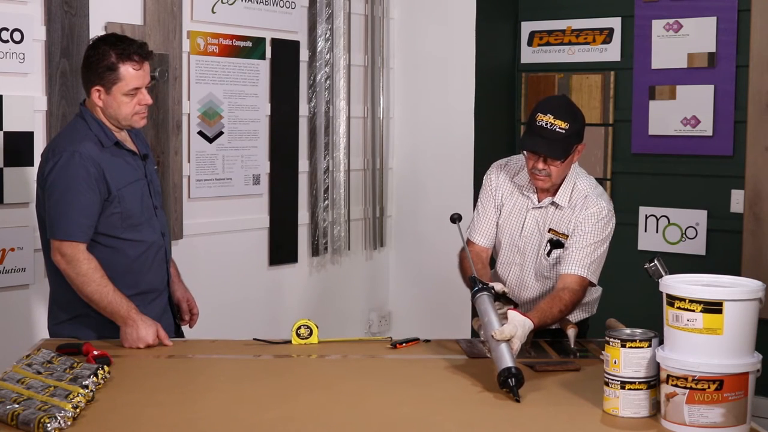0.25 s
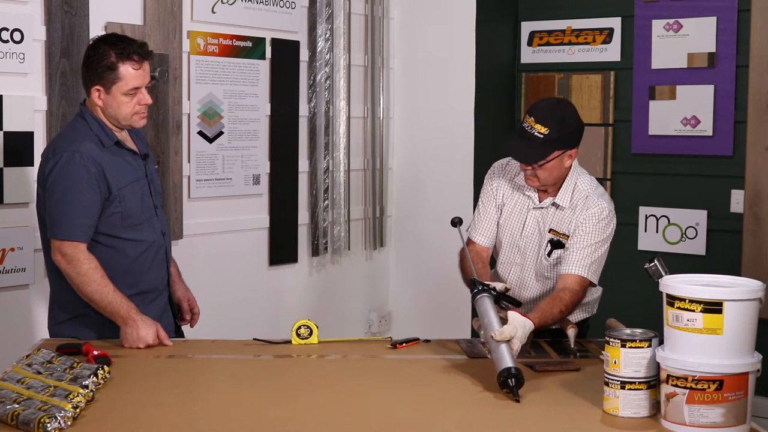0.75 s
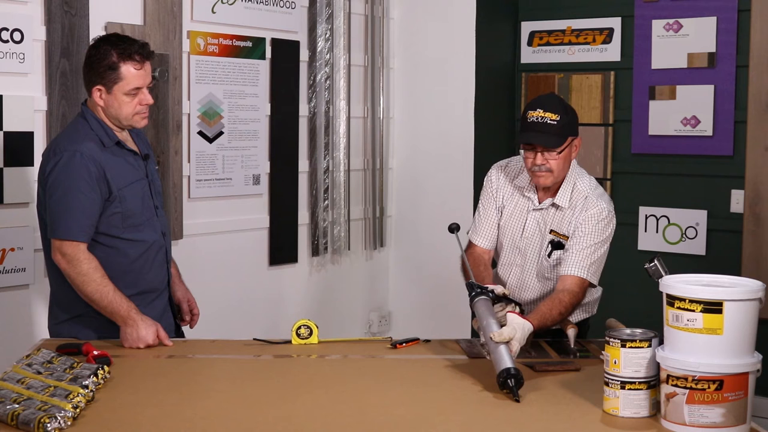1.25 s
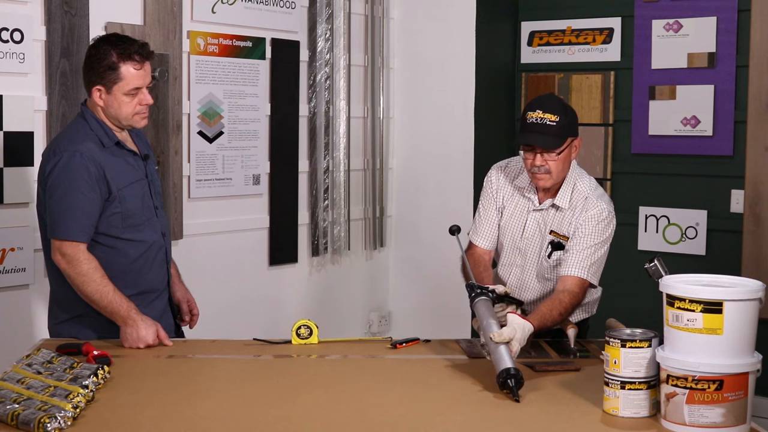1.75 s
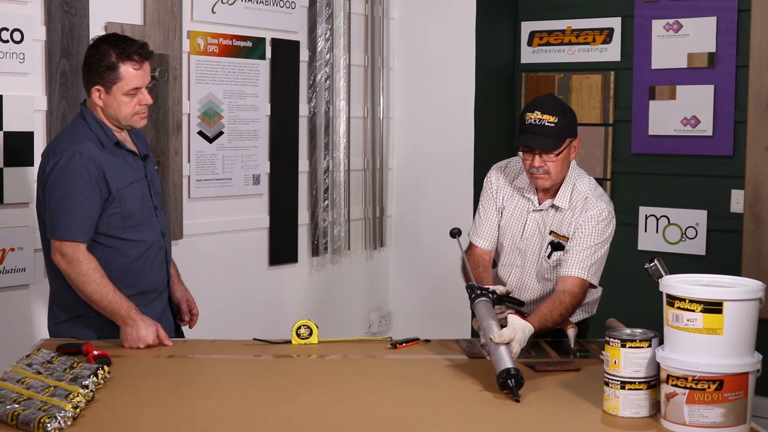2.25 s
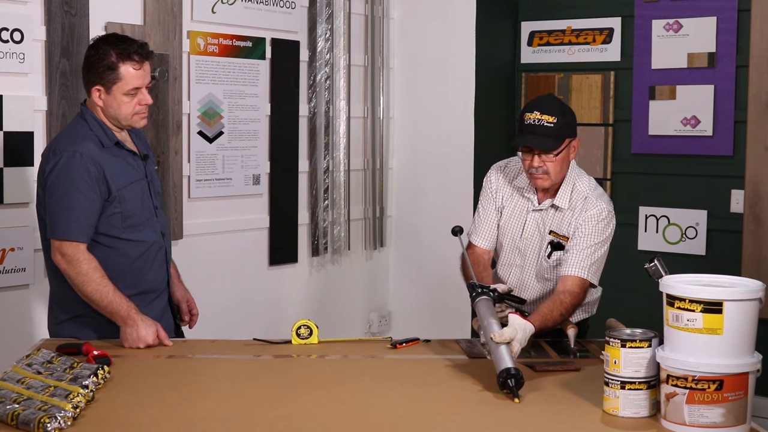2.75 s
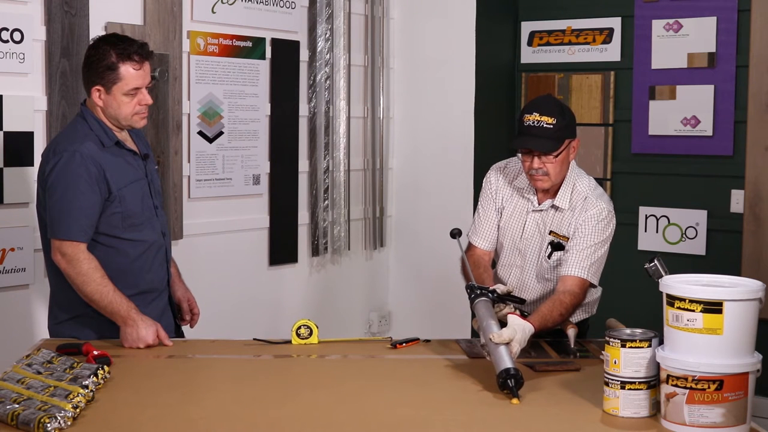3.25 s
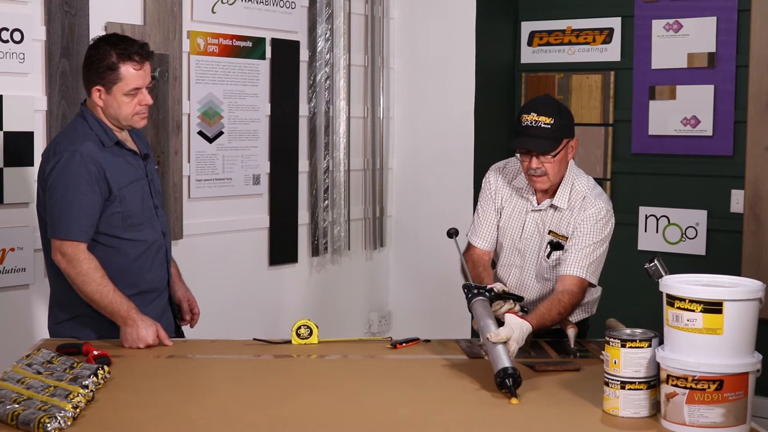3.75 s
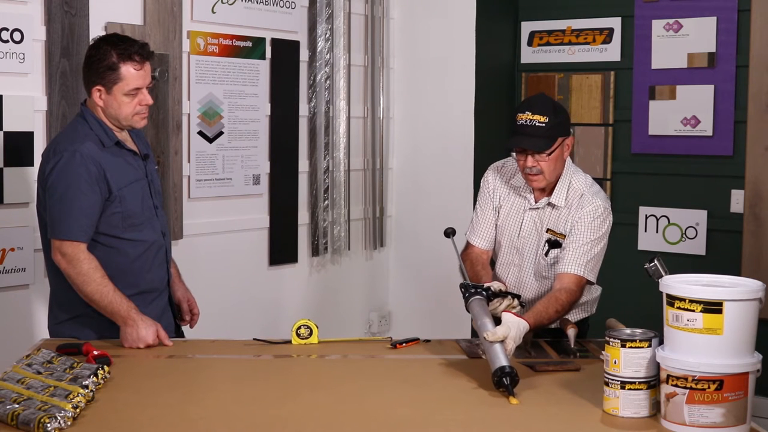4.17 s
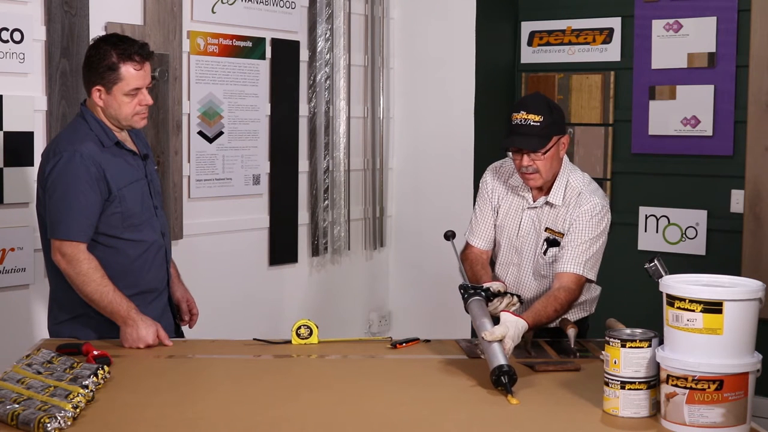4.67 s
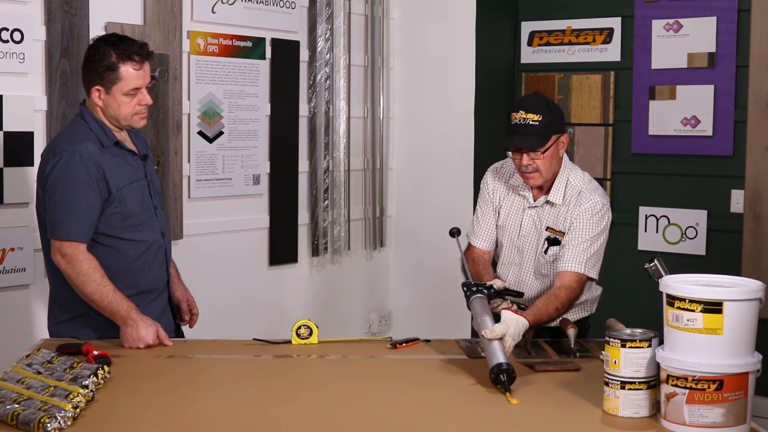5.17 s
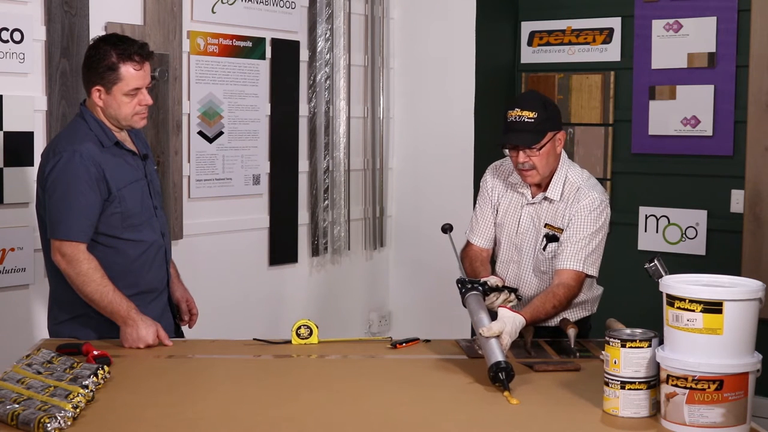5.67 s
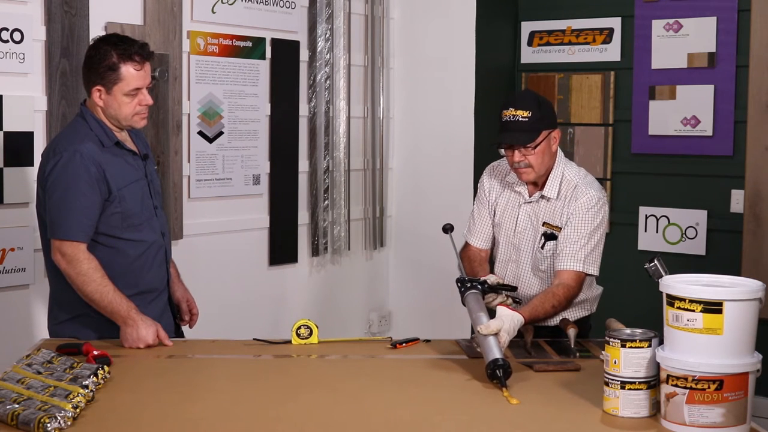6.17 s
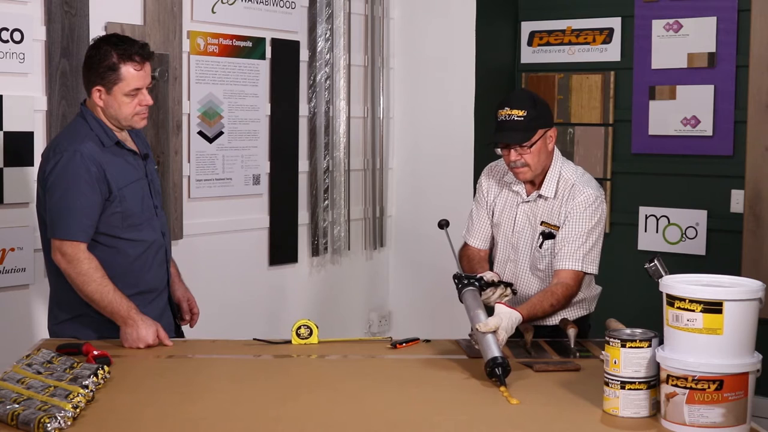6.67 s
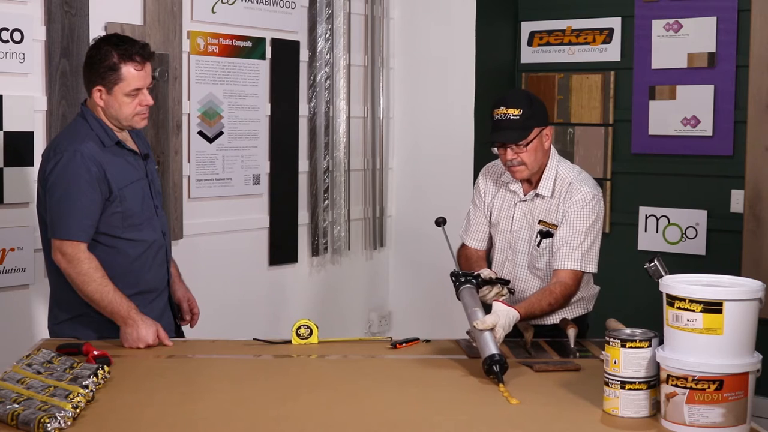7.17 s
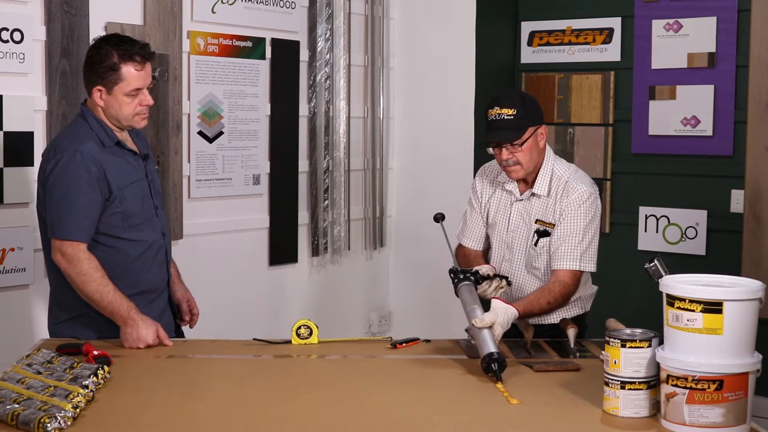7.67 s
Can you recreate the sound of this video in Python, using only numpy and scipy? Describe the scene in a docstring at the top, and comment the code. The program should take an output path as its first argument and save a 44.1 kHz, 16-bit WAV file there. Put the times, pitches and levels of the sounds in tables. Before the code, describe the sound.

A steel caulking gun is pumped close by in a quiet workshop with a little reverberation. From the start until about 2.8 seconds, the trigger is squeezed ten times, roughly three times a second, growing gradually softer. Each squeeze is a short metallic rasping click, with thin, high spring squeaks between. The grip plate clacks sharply at the very start, then judders and clacks at about 0.4 and 1.9 seconds. A cluster of clicks follows at 3.1 seconds and a few thin snaps near 3.8. The rest is sparse: a duller clack at 5 seconds, single lower squeaks around 5.1, 6.1 and 6.9, and small ticks and soft clinks until the end, near 8 seconds. Gloves and foil crackle faintly in the later part. Low room tone continues throughout, with faint distant drones coming and going.

```python
"""A steel caulking gun is pumped in a quiet workshop. The trigger rasps along the rod and the grip plate
judders and clacks back, all ringing the frame and barrel; the spring and the pivot squeak by stick-slip.
The pumping slows to single squeaks, ticks and soft clinks, while gloves and foil crackle.
Behind it, distant low drones come and go over room tone, a fan whine, a faint whistle and a soft hiss."""
import sys
import numpy as np
from scipy import signal
from scipy.fft import rfft, irfft, next_fast_len
from scipy.io import wavfile
from scipy.ndimage import uniform_filter1d

SR = 44100
rng = np.random.default_rng(int(sys.argv[2]) if len(sys.argv) > 2 else 0)


def generate_wav(sig):
    """Save sig (samples, or channels by samples) to the path in sys.argv[1] as 16-bit PCM at SR."""
    pcm = np.round(np.clip(np.atleast_2d(sig).T, -1, 1) * 32767).astype(np.int16)
    wavfile.write(sys.argv[1], SR, pcm)


N = 349342

# Ring of the frame and barrel: (pitch [Hz], level [dB], t60 [s])
FRAME_MODES = [(350, -17, 0.013), (669.7, -17, 0.023), (1083, -14, 0.032), (1503, -4, .012),
               (2050, -2.5, .011), (2520, -5, 0.013), (2770, 4.5, 0.0049), (3110, -9.5, 0.014),
               (3260, -20, 0.057), (3407, 11.5, 0.0023), (3768, 12, 0.0025), (4310, -22.5, .09),
               (4558, -16, 0.017), (5097, -5.5, 0.0069), (5430, -7.5, 0.0067), (5965, -9, 0.0099),
               (6737, -5, 0.0039), (7720, -9.5, 0.0049), (8550, -13.5, 0.009), (9300, -9.5, 0.002),
               (10630, -14, .006), (11100, -16, 0.00094), (13900, -21, .003)]
# Trigger squeezes, four touches each: (time [s], main touch delay [ms], last touch delay [ms],
# level [dB], last touch trim [dB], bass tilt [dB/octave])
SQUEEZES = [(0.1606, 17.3, 32.3, -15.5, -9, -15), (0.5063, 20.6, 35, -16, -11, -11),
            (0.7688, 19, 34.1, -18.5, -4.5, -6), (1.0716, 21, 35, -16.1, -11, 4.5),
            (1.4008, 21.2, 34.5, -19, -8.1, -4), (1.7066, 19.5, 35.1, -18, -8, -8),
            (2.0073, 16.6, 33.1, -21, -0.8, -10.5), (2.2574, 18.3, 42, -25, -18, -.6),
            (2.4882, 19, 30.2, -25.5, -8, -2), (2.7613, 19.2, 33.7, -24.5, -6, 1.5)]
# The four touches; the accent is the pitch that the struck spot favours:
# (level against the squeeze [dB], accent [Hz], treble tilt [dB/octave], base attack [ms])
SQUEEZE_TOUCHES = [(-13, 2100, 2, 1.6), (-4.5, 3500, 5, 3.1), (-1, 2750, 2, 1.3), (-1, 3500, 6, 1.4)]
# Touches and ticks turn crisper as the pumping slows: (time [s], attack scale [ratio])
ATTACK_SCALE = [(0, 0.89), (2.55, 0.98), (2.7, 0.66), (7.9, 0.73)]
# The trigger lets go: (time [s], touch level [dB], chirp level [dB], slide length [ms], slide level [dB])
RELEASES = [(0.291, -18.5, -63.5, 62, -69.5), (.592, -36, -45, 50, -83), (0.898, -38.5, -49, 59, -79),
            (1.223, -40.5, -48, 49, -79), (1.522, -34, -53, 49, -72.5), (1.809, -38.5, -46.5, 45, -70),
            (2.112, -36, -53, 46, -86), (2.345, -47, -60, 31, -78.5), (2.612, -40, -57, 64, -80.5)]
# The grip plate clacks back:
# (time [s], level [dB], accent [Hz], treble tilt [dB/octave], bass tilt [dB/octave], attack [ms])
PLATE_CLACKS = [(0.013, -1, 3105, 3.5, -2, 1.52), (0.374, -3, 3256, 4, 1.5, 0.96),
                (0.668, -15, 3130, -14, -1.5, 1.3), (1.87, -1.5, 2333, 2, -2.5, 1.36),
                (2.167, -11, 3170, -5.5, -3, 0.99), (4.9742, -18.5, 3050, -18.5, -2, 0.9)]
# Small ticks of the mechanism: (time [s], level [dB], accent [Hz], treble tilt [dB/octave])
TICKS = [(.5651, -26, 3530, 3), (.5754, -32, 2180, 8), (0.856, -26.5, 3960, -8), (1.1346, -35, 3140, 7),
         (1.191, -33, 3630, -7), (1.4866, -36.5, 3220, -6), (1.54, -42, 3680, 10), (1.7821, -28, 3490, 3.5),
         (2.0646, -29.5, 3530, 4), (2.1413, -32.5, 3760, 15.5), (2.3025, -27, 3280, 11.5),
         (2.5444, -27, 3300, 9.5), (2.565, -45, 3370, 12), (2.6383, -27, 2100, -2.5), (2.824, -38, 1720, 5),
         (3.048, -40.5, 2620, -1), (3.085, -29.5, 3700, 3), (3.0971, -23.5, 3260, 3.5),
         (3.1043, -20.5, 2790, 2), (3.1331, -26, 1546, -6), (3.2274, -35, 3370, -0.5),
         (4.0064, -44.5, 1737, 1.5), (5.1518, -32, 2270, -1.5), (5.172, -38, 3130, -2),
         (5.2933, -44, 3040, -7), (5.7716, -47, 3557, 0.7), (5.9414, -48, 3580, 7),
         (6.1764, -39, 3100, -0.5), (7.2417, -45, 3270, 10), (7.414, -45, 3520, -3.5),
         (7.7048, -44, 3000, 3.5), (7.88, -46, 5430, 0.3)]
# Thin bright snaps without body: (time [s], level [dB], accent [Hz])
SNAPS = [(3.7133, -53.5, 5960), (3.7501, -40.5, 4580), (3.7556, -43, 3850), (3.8272, -42.5, 3960),
         (3.839, -51, 5070)]
# Lone rubs along the rod: (time [s], length [ms], level [dB])
RUBS = [(1.679, 23, -83.5), (3.094, 30, -70)]
# The plate judders on the rod, one curve per judder: (time [s], slip rate [1/s], level [dB])
JUDDERS = [
    [(0.294, 347.6, -41.5), (0.308, 310.2, -35), (0.326, 310.8, -27), (0.362, 364.7, -34.5),
     (0.37, 350.6, -50)],
    [(1.826, 357.3, -47.5), (1.834, 359.3, -47.5), (1.84, 341.3, -35.5), (1.864, 357.9, -53)],
]
# Thin spring squeals in one to three swells: (time [s], first level [dB], first pitch [Hz],
# swells [count], spacing [ms], loss per swell [dB], rise per swell [Hz])
SPRING_SQUEALS = [(0, -28, 3410, 1, 8.6, 0, 0), (.334, -25.5, 3440, 1, 14, 0, 0),
                  (.612, -26.5, 3436, 2, 14, 2.5, 35), (.914, -28.5, 3445, 3, 15.5, 3.5, 29),
                  (1.251, -31, 3440, 2, 17, 0, 39), (1.549, -26, 3450, 1, 17, 0, 0),
                  (1.833, -30.5, 3530, 1, 18, 0, 0), (2.116, -34, 3440, 1, 18, 0, 0),
                  (2.368, -35.5, 3455, 3, 15.4, 5, 33), (2.617, -39, 3484, 3, 15, 4.5, 37)]
# Upward flicks that end some squeals: (time [s], level [dB], starting pitch [Hz])
SPRING_FLICKS = [(.949, -33, 3550), (1.567, -32, 3600), (1.851, -35.5, 3600), (2.138, -32, 3650)]
# Timbre of the spring: (multiple of the pitch [ratio], level [dB])
SPRING_PARTIALS = [(1, 0), (2, -29), (3, -30), (4, -36)]
# Pivot squeaks: (time [s], level [dB], strongest partial [Hz], core length [ms])
PIVOT_SQUEAKS = [(1.3984, -36.5, 1403, 9), (1.706, -35.5, 1450, 8.1), (2.0054, -34, 1394, 11.3),
                 (2.2584, -31.5, 1355, 11), (2.4897, -34, 1402, 21), (2.7421, -38.5, 1470, 17),
                 (5.1289, -35.5, 1405, 26.8), (6.1317, -36, 1390, 34), (6.8874, -36.5, 1365, 26.7)]
# Timbre of the pivot: (multiple of the strongest partial [ratio], level [dB])
PIVOT_PARTIALS = [(.5, -28), (1, 0), (1.5, -9), (2, -21), (2.5, -20), (3, -27), (3.5, -32), (4.5, -31),
                  (5.5, -35), (6.5, -34)]
# Timbre of the release chirp: (multiple of the pitch [ratio], level [dB])
CHIRP_PARTIALS = [(1, 0), (2, -16), (4, -14), (5, -9), (6, -18)]
# Soft clinks of something small and metallic: (time [s], peak level [dB])
CLINKS = [(4.005, -47.5), (5.772, -56.5), (6.72, -55.5), (7.415, -52.5)]
# Ring of a clink: (pitch [Hz], level [dB], t60 [s])
CLINK_MODES = [(1730, -1.5, 0.14), (2090, -9, 0.37), (2450, -8.5, 0.11), (2960, -21, 0.22),
               (3180, -6, 0.17), (3950, -9, 0.17)]
# Fader curve of the crackling foil and sealant: (time [s], level [dB])
CRACKLE_LEVELS = [(2.85, -78.5), (3.44, -83.5), (4.95, -84), (5.15, -77.5), (6.18, -73), (6.42, -75),
                  (6.59, -78), (6.87, -68), (7.43, -78.5), (7.62, -71.5), (7.809, -72), (7.92, -69.5)]
# EQ of the crackle: (frequency [Hz], gain [dB])
CRACKLE_EQ = [(1200, -14.5), (3000, 5.5), (6000, -2.5), (10000, -6), (13000, -10), (16000, -15)]
# A faint thin whistle: (time [s], pitch [Hz], level [dB])
WHISTLE = [(5.42, 4900, -84.5), (5.546, 4840, -67.5), (5.634, 4900, -73), (5.666, 5106, -77.5),
           (5.69, 4900, -86.5), (5.78, 4770, -82.5)]
# Distant drones: (time [s], length [s], starting pitch [Hz], end pitch [Hz], level at the crest [dB])
DRONES = [(1.548, .65, 215, 254, -58), (2.301, 0.45, 260, 275, -58.5), (4.647, .55, 252, 262, -63),
          (6.3, 0.93, 150, 164, -56.5)]
# EQ of the room tone: (frequency [Hz], gain [dB])
ROOM_TONE_EQ = [(24, -33), (40, -11.5), (92, -4), (121, -5.5), (156, -1.5), (315, -8), (375, -14.5),
                (405, -12.5), (547, -13.5), (704, -13), (839, -18), (2130, -25), (2350, -30),
                (15100, -47.5), (16300, -47)]
# Decay of the reverb tail: (frequency [Hz], t60 [s])
REVERB_T60 = [(200, 1.5), (1000, 1.13), (4000, 0.65), (8000, 0.74), (16000, 0.43)]
# EQ of the reverb tail: (frequency [Hz], gain [dB])
REVERB_EQ = [(300, 5.5), (1500, -3), (5000, 1), (7500, 2), (12000, -1.5)]


def trigger_touches():
    """Cues for metal_hits: a squeeze rasps in four quick touches, a release is one bright touch."""
    second_ms, fuller_db_per_octave = 7.3, 8.5
    release_voice = (1200, 10, 5, 1.7)   # accent, treble tilt, bass tilt, attack
    cues = [(s + .0043, db, *release_voice) for s, db, *_ in RELEASES]
    for s, main_ms, last_ms, level_db, trim_db, bass_db in SQUEEZES:
        delays_ms = (0, second_ms, main_ms, last_ms)
        for delay_ms, (db, hz, treble_db, attack_ms) in zip(delays_ms, SQUEEZE_TOUCHES):
            is_last = delay_ms == last_ms
            cues.append((s + delay_ms / 1000, level_db + db + is_last * trim_db, hz, treble_db,
                         bass_db + is_last * fuller_db_per_octave, attack_ms * attack_scale(s)))
    return cues


def ticks_and_snaps():
    """Cues for metal_hits: full little ticks of the mechanism and thin, fast snaps."""
    tick_bass_db, base_attack_ms = 5.5, 1.3
    snap_voice = (1.5, -12, .56)   # treble tilt, bass tilt, attack
    ticks = [(s, *voice, tick_bass_db, base_attack_ms * attack_scale(s)) for s, *voice in TICKS]
    return ticks + [(*snap, *snap_voice) for snap in SNAPS]


def attack_scale(s):
    """How soft the touches and ticks are at time s; smaller is crisper."""
    return np.interp(s, *np.transpose(ATTACK_SCALE))


def metal_hits(cues):
    """Each cue, laid out like PLATE_CLACKS, is a swarm of tiny impacts that rings the frame."""
    out, size, trim_db = np.zeros(N), 2000, -9
    scatter_db = 1.5 * rng.standard_normal((len(cues), len(FRAME_MODES)))
    impacts = rng.standard_normal((len(cues), size)) * rng.exponential(1, (len(cues), size)) ** .7
    for k, (s, level_db, accent_hz, treble_db, bass_db, attack_ms) in enumerate(cues):
        age = np.arange(size) / (SR * attack_ms / 1000)   # 1 at full force
        force = impacts[k] * age * np.exp(1 - age)
        force[0] = 2.3 * np.exp(-attack_ms / .65) * np.linalg.norm(force)   # fast hits open with a blow
        gain_db = mode_gains(accent_hz, treble_db, bass_db) + scatter_db[k]
        hit = frame_ring(force, gain_db, click_db=treble_db - 1.5)
        loudest_rms = np.sqrt(uniform_filter1d(hit ** 2, size=128).max())
        add(out, s, from_db(level_db + trim_db) * hit / loudest_rms)
    return out


def frame_ring(force, gain_db, click_db):
    """A force rings the steel frame's modes, with a little bare click on top."""
    hz, level_db, t60 = np.array(FRAME_MODES).T[:, :, None]
    t = np.arange(int(.1 * SR)) / SR
    signs = (-1.) ** np.arange(len(FRAME_MODES))[:, None]   # neighbouring modes swing against each other
    decays = from_db(level_db + gain_db[:, None] - 60 * t / t60)
    response = np.sum(signs * decays * np.sin(2 * np.pi * hz * t), axis=0)
    response[:2] += from_db(click_db) * np.array([1, -1])
    return signal.fftconvolve(force, response)


def mode_gains(accent_hz, treble_db, bass_db):
    """Voicing of the frame in dB: a bump at the accent, and tilts per octave either side of 3200 Hz."""
    hz = np.array(FRAME_MODES)[:, 0]
    octaves = np.log2(hz / 3200)
    accent_db = 10 * np.exp(-(np.log2(hz / accent_hz) / .12) ** 2)
    return accent_db + np.where(octaves > 0, treble_db * octaves, -bass_db * octaves)


def rod_friction():
    """The plate drags on the rod: grit through the frame under squeezes, pivot squeaks and releases."""
    drag_lead_s, squeeze_ms, squeak_ms = .003, 50, 55
    slides = [(s, squeeze_ms, db - 51) for s, _, _, db, *_ in SQUEEZES]
    slides += [(s, squeak_ms, db - 50) for s, db, *_ in PIVOT_SQUEAKS]
    slides += [(s, length_ms, db) for s, _, _, length_ms, db in RELEASES]
    slides = [(s - drag_lead_s, length_ms, db) for s, length_ms, db in slides]
    pressure = np.zeros(N)
    for s, length_ms, level_db in slides + RUBS:
        progress = np.minimum(np.arange(4000) / (length_ms * SR / 1000), 1)
        add(pressure, s, from_db(level_db) * np.sin(np.pi * progress))
    grit = rng.standard_normal(N) * rng.exponential(1, N) ** .5 * from_db(-1.5 * drift(150, N))
    gain_db = mode_gains(accent_hz=2700, treble_db=9, bass_db=8.5)
    return frame_ring(pressure * grit, gain_db, click_db=5)[:N]


def plate_judder(jitter=.025, scatter_db=2.5, grit_db=-25, sizzle_db=-7):
    """Nearly even slips of uneven size ring the low modes; grit and a bright sizzle lie on top."""
    out = np.zeros(N)
    dark = mode_gains(accent_hz=1020, treble_db=-3.5, bass_db=4)
    bright = mode_gains(accent_hz=4340, treble_db=11, bass_db=-3.5)
    for points in JUDDERS:
        slip_rate, level_db, fade = automation(points)
        start, size, gain = points[0][0], len(slip_rate), from_db(level_db) * fade
        cycles = np.cumsum(slip_rate * (1 + jitter * drift(120, size))) / SR
        slipping = np.diff(np.floor(cycles), prepend=0) > 0
        slips = slipping * from_db(scatter_db * rng.standard_normal(size))
        add(out, start, frame_ring(gain * slips, dark, click_db=-45.5))
        grit = from_db(grit_db) * rng.standard_normal(size)
        add(out, start, frame_ring(gain * grit, bright, click_db=-.5))
        sizzle = from_db(sizzle_db) * rms_one(band_noise(9300, 11800, size))
        add(out, start, gain * sizzle)
    return out


def stick_slip(cues, partials, waver, rough_db, skew, glide, flutter_db, sharpness=2):
    """Stick-slip locked to a mode: a swelling tone that bends late, its ragged overtones at the crest."""
    out, size = np.zeros(N), 3000
    for s, level_db, hz, core_ms in cues:
        swell_ms = 1.5 * core_ms
        progress = np.minimum(np.arange(size) / (swell_ms * SR / 1000), 1)
        swell = np.sin(np.pi * progress ** skew) ** sharpness
        pitch = hz * (1 + glide * progress ** 2 + waver * drift(60, size))
        phase = 2 * np.pi * np.cumsum(pitch) / SR
        tone = np.zeros(size)
        for multiple, db in partials:
            ragged_db = rough_db * drift(340, size) * (multiple != 1)
            bloom = swell if multiple > 1 else 1
            tone += from_db(db + ragged_db) * bloom * np.sin(multiple * phase + multiple ** 2)
        add(out, s - .002, from_db(level_db + flutter_db * drift(200, size)) * swell * tone)
    return out


def spring_squeals(shrink=.94, flick_ms=6):
    """The spring squeals in swells, each shorter and higher than the last; some end in an upward flick."""
    swells = [(s + k * step_ms / 1000, db - k * loss_db, hz + k * rise_hz, step_ms * shrink ** k)
              for s, db, hz, count, step_ms, loss_db, rise_hz in SPRING_SQUEALS for k in range(count)]
    flicks = [(*flick, flick_ms) for flick in SPRING_FLICKS]
    out = stick_slip(swells, SPRING_PARTIALS, waver=.003, rough_db=7.5, skew=.9, glide=.012, flutter_db=1.3)
    out += stick_slip(flicks, SPRING_PARTIALS, waver=.004, rough_db=5, skew=.9, glide=.12, flutter_db=1.6)
    return out


def pivot_squeaks():
    """The pivot sticks and slips: a lower, rounder squeak that sags in pitch."""
    return stick_slip(PIVOT_SQUEAKS, PIVOT_PARTIALS, waver=.012, rough_db=-1.5, skew=.73, glide=-.02,
                      flutter_db=1.6, sharpness=1.2)


def release_chirps(hz=2180, core_ms=28):
    """A stick-slip chirp with a fast attack as the trigger lets go."""
    cues = [(s, db, hz, core_ms) for s, _, db, *_ in RELEASES]
    return stick_slip(cues, CHIRP_PARTIALS, waver=.0072, rough_db=5.5, skew=.31, glide=.0051,
                      flutter_db=2.5)


def clinks(spread_db=5, contact_ms=3.8):
    """A brief rattling contact rings the same few modes, with new strengths each time."""
    out, t = np.zeros(N), np.arange(int(.25 * SR)) / SR
    hz, level_db, t60 = np.array(CLINK_MODES).T[:, :, None]
    for s, peak_db in CLINKS:
        strength_db = spread_db * rng.standard_normal(hz.shape)
        ring = np.sum(from_db(level_db + strength_db - 60 * t / t60) * np.sin(2 * np.pi * hz * t), axis=0)
        rattle = rng.standard_normal(len(t)) * np.exp(-t * 1000 / contact_ms)
        clink = signal.fftconvolve(rattle, ring)[:len(t)]
        add(out, s, from_db(peak_db) * clink / np.abs(clink).max())
    return out


def foil_crackle(flicker_db=.5, snaps_per_s=56, snap_db=3):
    """Gloves, foil and sealant: soft bright noise with tiny sticky snaps riding on it."""
    level_db = np.interp(np.arange(N) / SR, *np.transpose(CRACKLE_LEVELS)) + flicker_db * drift(25, N)
    snapping = rng.random(N) < snaps_per_s / SR
    snaps = snapping * from_db(snap_db + 3.5 * np.minimum(rng.exponential(1, N), 3))
    bursts = signal.lfilter([1], [1, -.985], snaps + 1e-18)   # each snap lasts about 2 ms
    return from_db(level_db) * (1 + bursts) * shaped_noise(CRACKLE_EQ)


def soft_hiss(s, length_s, low_hz, high_hz, level_db):
    """A smooth band of high noise under one long swell."""
    out, size = np.zeros(N), int(length_s * SR)
    swell = np.sin(np.pi * (np.arange(size) / size) ** .6)
    add(out, s, from_db(level_db) * swell * rms_one(band_noise(low_hz, high_hz, size)))
    return out


def drone(s, length_s, first_hz, last_hz, crest_db, edge_db=-8.5):
    """A low wavering tone that climbs in pitch, loudest just past its middle."""
    progress = np.linspace(0, 1, 9)
    hz = first_hz + progress * (last_hz - first_hz)
    level_db = crest_db + edge_db * (1 - np.sin(np.pi * progress ** 1.3))
    points = np.transpose([s + progress * length_s, hz, level_db])
    return wavering_tone(points, waver=.008, flutter_db=2.5, rate_hz=12)


def fan_whine(hz, level_db):
    """A faint fan tone that never stops, its level wandering slowly."""
    return wavering_tone([(0, hz, level_db), (N / SR, hz, level_db)], waver=.004, flutter_db=5.5,
                         rate_hz=2.9)


def wavering_tone(points, waver, flutter_db, rate_hz):
    """An unsteady sine that follows points of (time [s], pitch [Hz], level [dB])."""
    out = np.zeros(N)
    hz, level_db, fade = automation(points)
    phase = 2 * np.pi * np.cumsum(hz * (1 + waver * drift(rate_hz, len(hz)))) / SR
    gain = from_db(level_db + flutter_db * drift(rate_hz, len(hz))) * fade
    add(out, points[0][0], np.sqrt(2) * gain * np.sin(phase))
    return out


def workshop_reverb(send, tail_db=-17.5, echo_s=.019, echo_db=-20):
    """One slap from the near wall and a diffuse tail that dies band by band."""
    t = np.arange(int(.7 * SR)) / SR
    edges_hz = 90 * 2 ** np.arange(0, 7.6, .5)
    tail = np.zeros(len(t))
    for low, high in zip(edges_hz, edges_hz[1:]):
        hz = np.sqrt(low * high)
        decay = from_db(at_hz(REVERB_EQ, hz) - 60 * t / at_hz(REVERB_T60, hz))
        tail += band_noise(low, high, len(t)) * decay
    tail *= 1 - np.exp(-t / .0088)   # the tail takes a moment to build
    tail *= from_db(tail_db) / np.linalg.norm(tail)
    tail[int(echo_s * SR)] += from_db(echo_db)
    return signal.fftconvolve(send, tail)[:N]


def shaped_noise(eq):
    """A steady noise bed with this EQ; rms 1."""
    size = next_fast_len(N)
    hz = np.maximum(np.fft.rfftfreq(size, 1 / SR), 1)
    spectrum = rfft(rng.standard_normal(size)) * from_db(at_hz(eq, hz))
    return rms_one(irfft(spectrum, size)[:N])


def band_noise(low_hz, high_hz, size):
    band = signal.butter(2, [low_hz, high_hz], "band", fs=SR, output="sos")
    return signal.sosfilt(band, rng.standard_normal(size))


def drift(rate_hz, size):
    """Smooth random modulation; rms 1."""
    pole, run_in = np.exp(-2 * np.pi * rate_hz / SR), int(SR / rate_hz)
    wander = signal.lfilter([1], [1, -2 * pole, pole * pole], rng.standard_normal(size + run_in))
    return rms_one(wander[run_in:])


def automation(points):
    """One curve for each column after the time, plus a 3 ms fade at both ends."""
    s, *columns = np.transpose(points)
    t = np.arange(s[0], s[-1], 1 / SR)
    fade = np.clip(np.minimum(t - s[0], s[-1] - t) / .003, 0, 1)
    return [np.interp(t, s, column) for column in columns] + [fade]


def low_cut(x, hz, order):
    return signal.sosfilt(signal.butter(order, hz, "high", fs=SR, output="sos"), x)


def at_hz(points, hz):
    """Read a curve on a log-frequency axis."""
    points_hz, values = np.transpose(points)
    return np.interp(np.log(hz), np.log(points_hz), values)


def from_db(db):
    return 10 ** (np.asarray(db) / 20)


def rms_one(x):
    return x / np.sqrt(np.mean(x ** 2) + 1e-20)


def add(out, s, sound):
    """Mix a sound in at time s."""
    i = max(round(s * SR), 0)
    out[i:i + len(sound)] += sound[:N - i]


def scene():
    """The mono mix: the gun up front, its reverb, and the quiet bed behind."""
    hits = metal_hits(PLATE_CLACKS + ticks_and_snaps() + trigger_touches())
    metal = low_cut(hits + rod_friction(), hz=450, order=2)   # thin steel radiates no bass
    metal += low_cut(plate_judder(), hz=260, order=4) + clinks()
    squeaks = spring_squeals() + pivot_squeaks() + release_chirps()
    reverb = workshop_reverb(metal + from_db(-2.5) * squeaks)   # squeaks beam forward, less into the room
    bed = sum(drone(*cue) for cue in DRONES)
    bed += fan_whine(hz=2110, level_db=-86)
    bed += wavering_tone(WHISTLE, waver=.0121, flutter_db=4, rate_hz=155)
    bed += foil_crackle()
    bed += from_db(-56) * shaped_noise(ROOM_TONE_EQ)
    bed += soft_hiss(s=6.55, length_s=.9, low_hz=8800, high_hz=11500, level_db=-80)
    return (metal + squeaks + reverb + bed)[None]


def record(dry):
    """A steep high cut, 70 dB down from 16.3 kHz."""
    return signal.sosfilt(signal.cheby2(12, 70, 16300, fs=SR, output="sos"), dry)


dry = scene()
out = record(dry)
generate_wav(out)
```